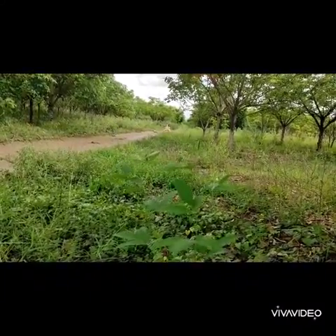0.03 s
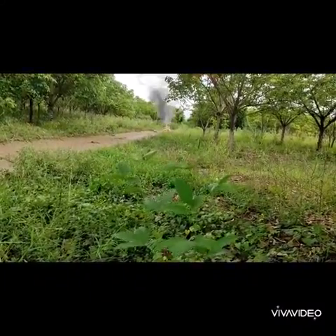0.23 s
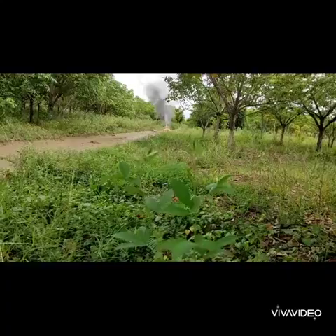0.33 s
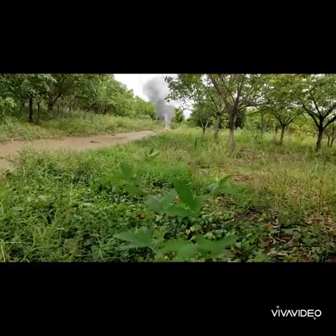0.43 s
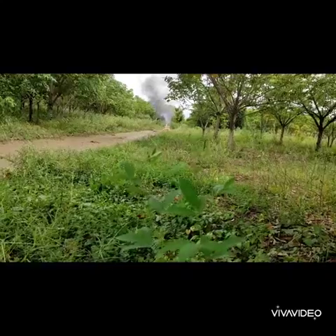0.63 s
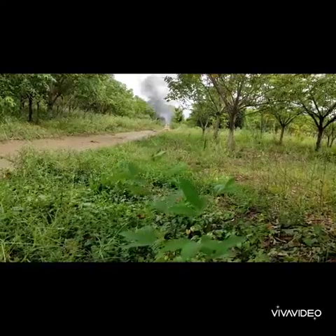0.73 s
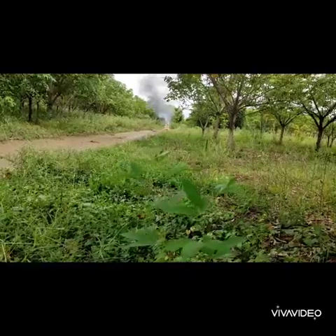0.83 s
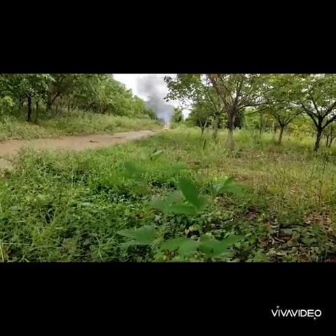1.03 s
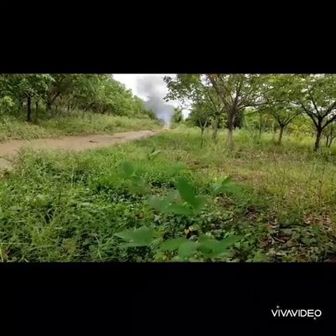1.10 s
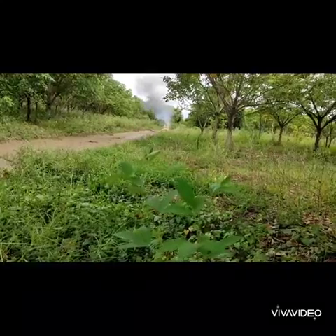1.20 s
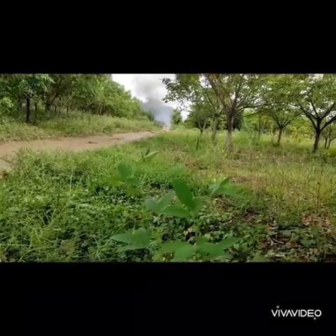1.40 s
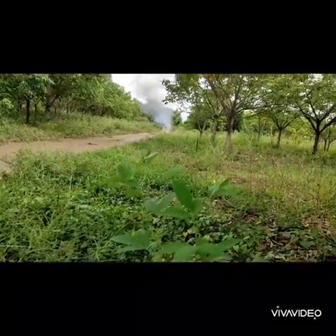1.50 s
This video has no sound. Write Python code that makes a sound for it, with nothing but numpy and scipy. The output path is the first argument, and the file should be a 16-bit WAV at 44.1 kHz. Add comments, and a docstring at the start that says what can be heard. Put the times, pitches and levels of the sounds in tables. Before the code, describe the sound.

Quiet open air with a faint, high insect tone until about 0.24 s, when a sharp small blast cracks, followed at 0.31 s by a heavier, crackling explosion with a brief low ring. A bright hiss of echoes from the trees fades by about 0.9 s, while dull thumps and rumble roll on, weakening to 1.5 s. Very faint bird-like chirps come near 1.0, 1.35 and 1.53 s.

```python
"""Two blasts on a distant dirt road, a small one and then a heavy one, break a quiet in which an insect sings.
Each arrives as a few N-shaped shock fronts with ringing resonances and a burst of crackling noise.
Trees scatter the blasts into a long hiss of random echoes that the air dulls; banks and hills send back
low thumps, as windowed sines, over a rumble of sparse echoes. Filtered noise makes the insect and the
faint open air; brief sine tones chirp like birds."""
import sys
import numpy as np
from scipy import signal
from scipy.io import wavfile

SR = 44100
rng = np.random.default_rng(int(sys.argv[2]) if len(sys.argv) > 2 else 0)


def to_linear_factor(level_db):
    """Convert decibel levels (scalar or array-like) to linear amplitude factors."""
    exponent = np.asarray(level_db, float) / 20
    return 10 ** exponent


def to_wav(sig):
    """Store sig (one row per channel, or 1-D mono) as 16-bit WAV at the path in sys.argv[1].

    Samples outside -1..1 are clipped; the rate is SR.
    """
    pcm = np.clip(np.atleast_2d(sig), -1, 1) * 32767
    pcm = np.round(pcm).astype(np.int16)
    wavfile.write(sys.argv[1], SR, pcm.T)  # frames by channels


N = 68355
SMALL_S, HEAVY_S = .2383, .3088   # onsets of the two charges, seconds


def rms_one(x):
    """Normalises a signal to unit root-mean-square."""
    return x / np.sqrt(np.mean(x ** 2) + 1e-20)


def in_time(rows, before_db=-120.):
    """Level envelope in dB: straight lines between (s, dB) points."""
    s, db = np.transpose(rows)
    return np.interp(np.arange(N) / SR, s, db, left=before_db)


def at_hz(points, hz):
    """Reads a frequency curve, interpolated on a logarithmic frequency axis."""
    return np.interp(np.log(hz), np.log(np.array(points)[:, 0]), np.array(points)[:, 1])


def pan(db):
    """Level difference between the ears, left over right, split evenly as two gains."""
    return to_linear_factor(np.array([[db / 2], [-db / 2]]))


def dull(x, top_hz):
    """Second-order low-pass: treble above top_hz falls away."""
    return signal.sosfilt(signal.butter(2, min(top_hz, .45 * SR), fs=SR, output="sos"), x)


def drift(rate_hz):
    """Slow random fluctuation of unit rms: noise through a double real pole."""
    step = 40   # samples between drawn values
    pole = np.exp(-2 * np.pi * step * rate_hz / SR)
    noise = rng.standard_normal(N // step + 502)
    slow = signal.lfilter([1], [1, -2 * pole, pole * pole], noise)[500:]   # settled part only
    return np.interp(np.arange(N) / step, np.arange(len(slow)), rms_one(slow))


def arrivals(per_s, spread_db):
    """Random impulse trains of uneven size and sign: two draws of a mid and a side train."""
    shape = (2, 2, N)
    present = rng.random(shape) < per_s / SR
    size = to_linear_factor(spread_db * np.minimum(rng.exponential(1, shape), 4))
    return rms_one(present * size * rng.choice([-1, 1], shape))


def coloured(trains, spectrum, loss=None, patchy_db=0., likeness=None):
    """Third-octave filter bank setting level, fading, coherence and balance; rms 1 before fading and balance."""
    # coherence of the two channels: hz, likeness (0 to 1)
    usual_likeness = [(60, 0.57), (130, 0.95), (290, 0.86), (630, 0.79), (1380, 0.049), (3030, 0.16),
                      (6640, 0.041), (14500, .2)]
    # level of left over right: hz, balance_db
    balance = [(60, 0), (200, 0.5), (690, -0.5), (1270, 1), (2330, -5.5), (4290, -4), (7900, -0.5),
               (14500, 3.5)]
    likeness = usual_likeness if likeness is None else likeness
    out, power = 0, 0
    edges = 22 * 2 ** np.arange(0, 9.9, 1 / 3)
    since = np.maximum(np.arange(N) / SR - HEAVY_S, 0)
    for k, (low, high) in enumerate(zip(edges, edges[1:])):
        hz = np.sqrt(low * high)
        if not spectrum[0][0] < hz < spectrum[-1][0]:
            continue
        band_pass = signal.butter(2, [low, high], "band", fs=SR, output="sos")
        mid, side = signal.sosfilt(band_pass, trains[k % 2] + 1e-18)   # neighbouring bands use different draws
        alike = np.clip(at_hz(likeness, hz), 0, 1)
        stereo = np.sqrt(1 + alike) * mid + np.sqrt(1 - alike) * side * [[1], [-1]]
        band = to_linear_factor(at_hz(spectrum, hz)) * stereo
        power += np.mean(band ** 2)
        fade_db = -at_hz(loss, hz) * since if loss is not None else 0
        out = out + band * pan(at_hz(balance, hz)) * to_linear_factor(fade_db + patchy_db * drift(12.0))
    return out / np.sqrt(power)


def shocks():
    """N-waves: pressure rises suddenly, falls straight through zero and quickly returns."""
    # fronts, direct and off the ground nearby: start_s, level_db, length_ms, left_over_right_db
    fronts = [(.2382, -12, .9, 1), (.2390, -3, 1.2, 0), (.2404, -12, 1.4, 4), (.2419, -10, 1.6, 3),
              (.3087, -6, 2.8, 5), (.3118, -9, 3.3, 1), (.3152, -4, 3.0, 3), (.3190, -9, 5.0, 4)]
    out, t = np.zeros((2, N)), np.arange(N) / SR
    for s, db, ms, side_db in fronts:
        phase = (t - s) * 1000 / ms
        edge = np.clip(np.minimum(phase * 8, (1 - phase) * 5), 0, 1)
        out += pan(side_db) * to_linear_factor(db) * (1 - 2 * phase) * edge
    return out


def crackle():
    """Debris noise behind each front: random impulses hold, then decay exponentially; the small charge is duller."""
    # bursts: start_s, level_db, hold_s, t60_s, treble_limit_hz
    bursts = [(.2383, -8, .003, .025, 6000), (.3087, -8.5, .018, .015, 18000)]
    # relative spectral density: hz, density_db (per Hz)
    crackle_colour = [(300, -20), (660, 14), (1400, 7), (2500, 6.5), (4250, 8.5), (7000, 3.5), (10000, 1),
                      (16500, 4.5)]
    # coherence of the two channels: hz, likeness (0 to 1)
    crackle_likeness = [(300, 0.21), (1500, 0.1), (5000, 0.082), (12000, 0.14)]
    t, out = np.arange(N) / SR, 0
    noise = coloured(arrivals(6000, 2.85), crackle_colour, likeness=crackle_likeness)
    for s, db, hold, t60, top_hz in bursts:
        decay_db = -60 * np.maximum(t - s - hold, 0) / t60
        out = out + (t > s) * to_linear_factor(db + decay_db) * dull(noise, top_hz)
    return out


def ring(s, hz, db, t60):
    """Damped resonance: a cosine that rises within 0.4 ms and decays exponentially, by 60 dB in t60 seconds."""
    t = np.maximum(np.arange(N) / SR - s, 0)
    rise = np.minimum(t / .0004, 1)
    return to_linear_factor(db - 60 * t / t60) * np.cos(2 * np.pi * hz * t) * rise


def rings():
    """Modal ringing of ground and air pocket, struck by each charge and stronger on the left."""
    # modes struck by each charge: pitch_hz, level_db, t60_s
    small_modes = [(194.3, -12, 0.12), (222, -28.5, 0.097), (547, -21, 0.14), (1074, -20.5, 0.081),
                   (713, -15.5, 0.039), (372, -27.5, .13), (96, -25, 0.15)]
    heavy_modes = [(83, -12.5, 0.13), (267, -16, 0.08), (599.4, -5, 0.05), (162, -20.5, 0.11),
                   (1815, -22.5, 0.25)]
    small = sum(ring(SMALL_S, *mode) for mode in small_modes)
    heavy = sum(ring(HEAVY_S, *mode) for mode in heavy_modes)
    return pan(6.4) * small + pan(7.7) * heavy


def trees():
    """Multiple scattering: countless small echoes; the later they come, the more treble the air has absorbed."""
    # scatter envelopes of the small and the heavy charge: time_s, level_db
    small_scatter = [(.2385, -24), (.256, -26), (.285, -30), (.296, -31), (.301, -44), (.307, -32)]
    heavy_scatter = [(0.329, -12), (0.352, -16), (.55, -19.5), (.71, -23), (.8, -29.5), (.87, -34),
                     (.95, -39), (1.051, -42), (1.151, -48), (1.25, -50.5), (1.4, -54.5), (1.55, -54.5)]
    # relative spectral density: hz, density_db (per Hz)
    scatter_colour = [(300, -30), (400, -5.5), (560, -6), (850, -13.5), (1310, -7.5), (2100, 0.5),
                      (2700, -1), (4000, -3), (5500, -6), (7000, -7), (9500, -6.5), (12000, -50),
                      (16500, -29)]
    # air absorption on top of the envelope's fall: hz, loss_db_per_s (negative slows the fall)
    air_loss = [(400, -9.5), (1000, -16), (2500, -4.5), (5000, 3), (9000, 19.5), (14000, 29)]
    trains = arrivals(per_s=6000, spread_db=3)
    echoes = coloured(trains, scatter_colour, air_loss, patchy_db=1.1)
    before_heavy = np.arange(N) < HEAVY_S * SR
    small = to_linear_factor(in_time(small_scatter)) * before_heavy * dull(echoes, 6660)
    heavy = to_linear_factor(in_time([(HEAVY_S, -22)] + heavy_scatter)) * echoes
    return small + heavy


def rumble():
    """Diffuse reflection from banks and hills: sparse dull echoes that roll together."""
    # envelope: time_s, level_db
    rumble_levels = [(0.33, -20.5), (0.352, -23), (0.648, -16), (0.666, -19.5), (0.696, -16.5), (0.82, -21),
                     (0.968, -25.5), (0.996, -22), (1.052, -22.5), (1.08, -28), (1.098, -26),
                     (1.182, -26.5), (1.204, -19.5), (1.261, -28.5), (1.3, -26), (1.346, -32),
                     (1.55, -29.5)]
    # relative spectral density: hz, density_db (per Hz)
    rumble_colour = [(15, -69.5), (25, -25), (75, -3.5), (113, -10), (151, -1), (310, -3.5), (385, -22.5),
                     (568, -2.5), (700, -34.5), (910, -46.5), (1540, -120)]
    # loss on top of the envelope's fall: hz, loss_db_per_s (negative slows the fall)
    rumble_loss = [(30, -7.5), (100, -4.5), (200, 5), (300, 9.5), (600, 20)]
    echoes = coloured(arrivals(per_s=500, spread_db=3), rumble_colour, rumble_loss)
    return to_linear_factor(in_time([(HEAVY_S, -40)] + rumble_levels)) * echoes


def thumps():
    """Discrete reflections: the loudest echoes stand out as low tone bursts under a sine-squared window."""
    # single echoes: start_s, level_db (before the common trim), pitch_hz
    echoes = [(0.329, -11, 214), (0.577, -9.5, 202), (0.622, -14.5, 198), (0.637, -15.5, 156),
              (0.692, -16, 170), (0.748, -10, 215), (0.91, -16, 228), (1.003, -18, 95.4),
              (1.039, -14.5, 130.4), (1.088, -11.5, 98), (1.116, -15, 200), (1.146, -17, 105),
              (1.191, -14, 154), (1.283, -15, 97.4), (1.312, -20, 177), (1.404, -24, 185)]
    length_cycles, trim_db = 2.67, -2.5
    t, out = np.arange(N) / SR, 0
    for s, db, hz in echoes:
        progress = np.clip((t - s) * hz / length_cycles, 0, 1)
        out = out + to_linear_factor(db + trim_db) * np.sin(np.pi * progress) ** 2 * np.sin(2 * np.pi * hz * (t - s))
    return pan(0.89) * out


def chirps():
    """Windowed sine tones: brief, soft and bird-like."""
    # tones: start_s, level_db, pitch_hz, length_s
    tones = [(.195, -62, 1150, .02), (.985, -39, 980, .03), (1.332, -54, 1950, .01),
             (1.358, -39, 2000, .016), (1.361, -50, 3750, .012), (1.533, -46, 3600, .014)]
    t, out = np.arange(N) / SR, 0
    for s, db, hz, length in tones:
        window = np.sin(np.pi * np.clip((t - s) / length, 0, 1)) ** 2
        out = out + to_linear_factor(db) * window * np.sin(2 * np.pi * hz * t)
    return out


def insect():
    """Narrow-band noise sings near one pitch; its random beating is partly evened out."""
    # envelope: time_s, level_db
    song_levels = [(0, -59.5), (.06, -48.5), (.1, -55), (.15, -58.5), (.2, -65), (.3, -68)]
    pitch_hz, width_hz, evenness = 2785, 120, .5
    band = signal.butter(2, [pitch_hz - width_hz / 2, pitch_hz + width_hz / 2], "band", fs=SR, output="sos")
    noise = rng.standard_normal((2, N)) + 0.2 * rng.standard_normal(N)   # partly shared by both channels
    song = rms_one(signal.sosfilt(band, noise))
    envelope = np.abs(signal.hilbert(song))
    song = rms_one(song / (envelope + .1) ** evenness)
    return to_linear_factor(in_time(song_levels)) * song


def open_air():
    """Broadband noise, shaped by band filters into the faint sound of open air."""
    # relative spectral density: hz, density_db (per Hz)
    air_colour = [(20, 6.5), (80, -4), (220, -15.5), (850, -24.5), (1150, -20), (1400, -25), (2300, -27.5),
                  (4000, -25.5), (6000, -26.5), (9000, -26.5), (16500, -40)]
    noise = coloured(rng.standard_normal((2, 2, N)), air_colour, patchy_db=.7)
    return to_linear_factor(-54.5) * noise[:, ::-1]   # reversed in time, so that its bands already sound at the start


def ground_dip(fronts):
    """Destructive interference: the small charge's ground echo cancels a band near 1490 Hz."""
    small = fronts * (np.arange(N) < (SMALL_S + HEAVY_S) / 2 * SR)
    heavy = fronts - small
    return heavy + signal.lfilter(*signal.iirnotch(1490, 3.7, SR), small)


def scene():
    """Superposes the blasts, their echoes and the quiet field."""
    fronts = ground_dip(shocks() + crackle())
    echoes = trees() + rumble() + thumps()
    return fronts + rings() + echoes + chirps() + insect() + open_air()


def roll_off(x):
    """The treble ends steeply here."""
    return signal.sosfilt(signal.butter(12, 15140, fs=SR, output="sos"), x)


def record(dry):
    """Microphone high-pass and soft saturation. Separately, above a narrow gap near 7.8 kHz the treble sounds
    weaker."""
    ports = []
    for port, low_hz in zip(dry, (45, 78.6)):   # bass limits of left and right
        high_pass = signal.butter(2, low_hz, "high", fs=SR, output="sos")
        ports.append(signal.sosfilt(high_pass, port))
    x = 0.86 * np.tanh(np.array(ports) / 0.93)   # rounds the peaks
    main = signal.sosfilt(signal.cheby2(14, 45, 7700, fs=SR, output="sos"), x)
    upper = signal.sosfilt(signal.cheby2(10, 45, [7900, 14900], "band", fs=SR, output="sos"), x)
    return roll_off(main + to_linear_factor(-10.5) * upper)


dry = scene()
out = record(dry)
to_wav(out)
```